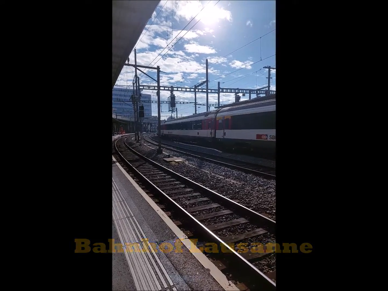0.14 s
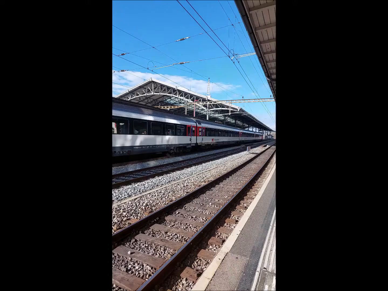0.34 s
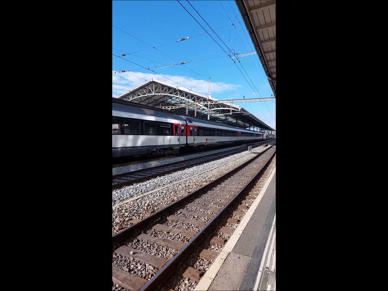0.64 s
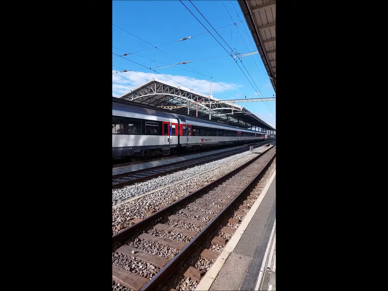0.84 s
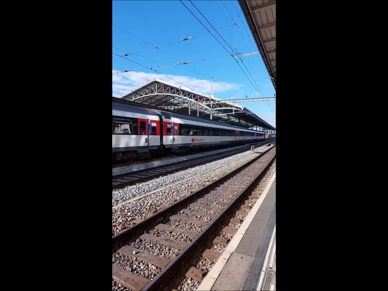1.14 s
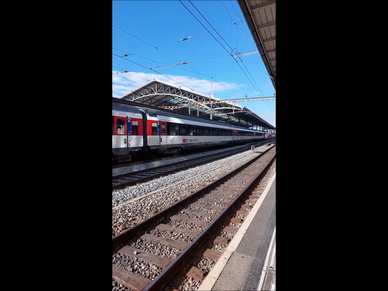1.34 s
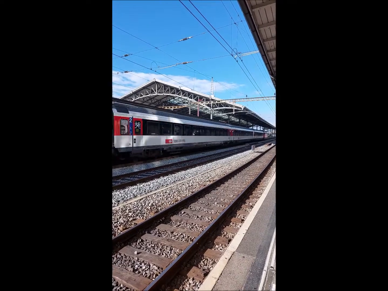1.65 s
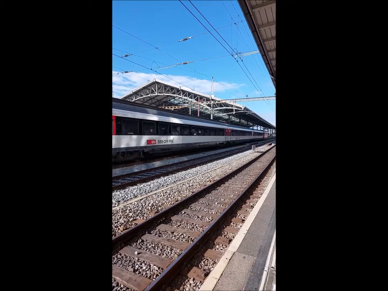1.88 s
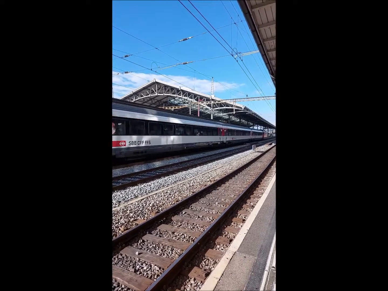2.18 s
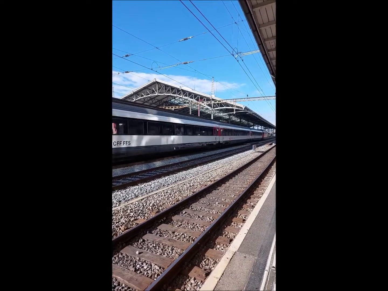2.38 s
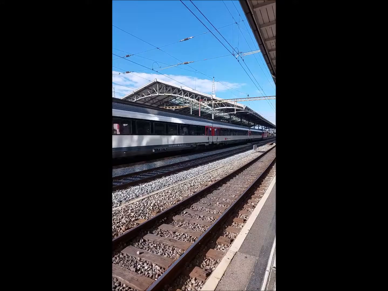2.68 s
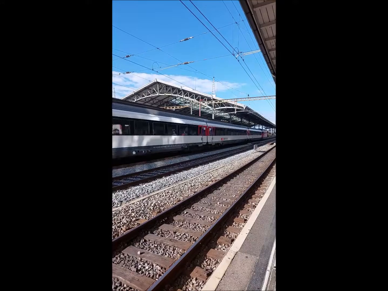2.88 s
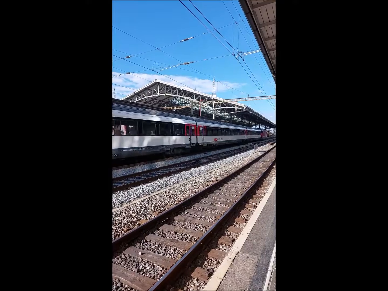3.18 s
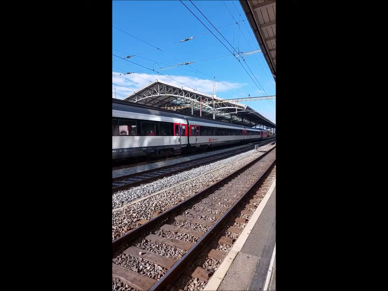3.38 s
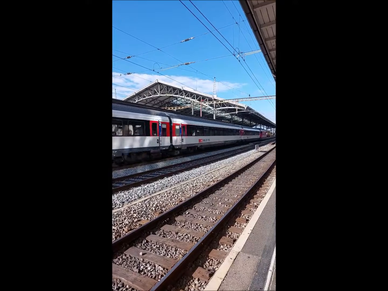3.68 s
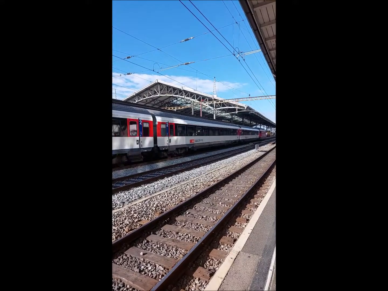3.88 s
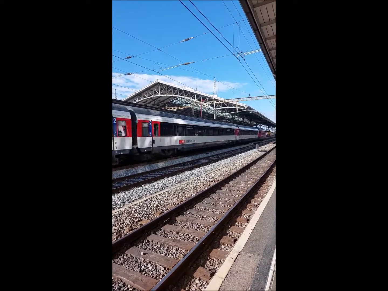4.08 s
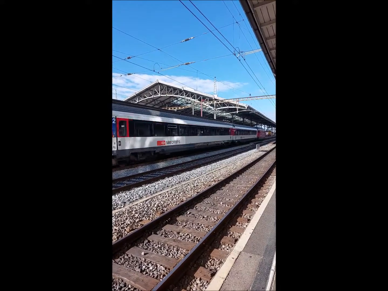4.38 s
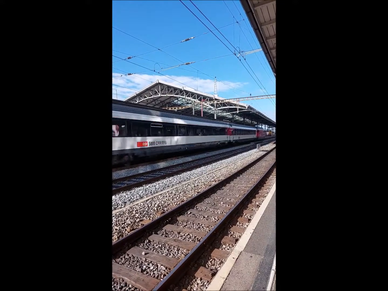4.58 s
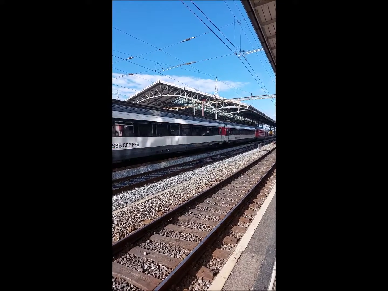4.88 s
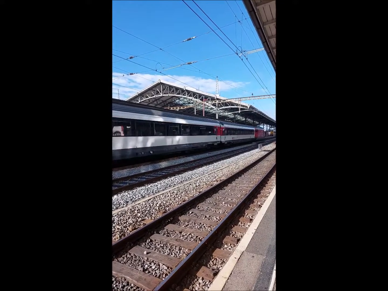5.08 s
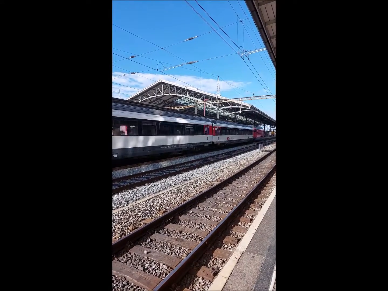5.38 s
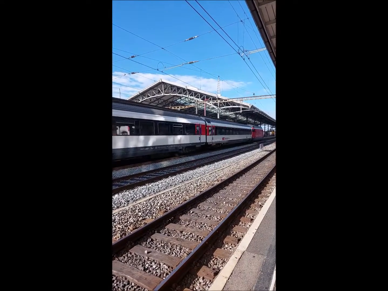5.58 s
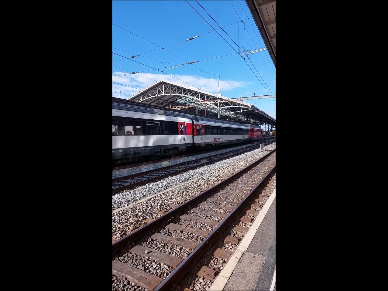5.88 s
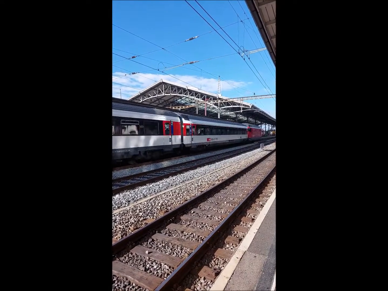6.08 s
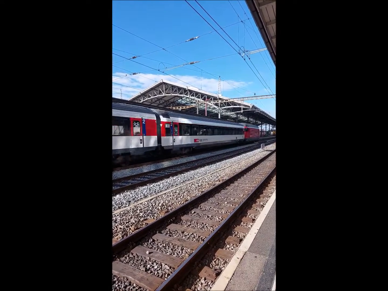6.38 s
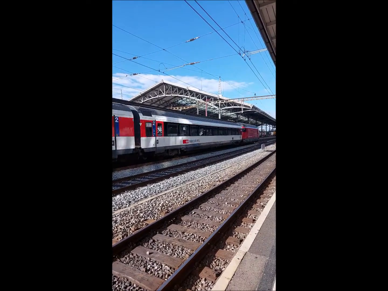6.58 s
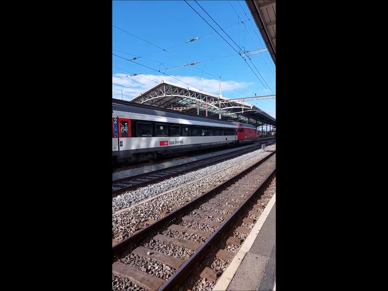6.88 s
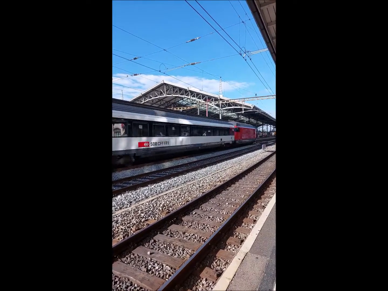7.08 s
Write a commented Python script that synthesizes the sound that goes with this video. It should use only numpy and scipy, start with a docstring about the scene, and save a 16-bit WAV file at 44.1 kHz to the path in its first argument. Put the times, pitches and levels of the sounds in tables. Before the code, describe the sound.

A passenger train rolls past a station platform, its wheels giving several high, sustained squeals over a low rumble.

```python
"""Steel wheels squeal as passenger coaches roll past a station platform on curved track. Stick-slip friction
sustains their high modes, and the Doppler effect lowers most notes a little. Flanges grind and hiss in sliding
contact with the rail; surface roughness and rail joints force the bogies and the ground into rumbling
vibration. A first scene, the faint rumble of another train, fades out; the scene changes, and after a short
silence this train fades in."""
import sys
import numpy as np
from scipy import signal
from scipy.fft import rfft, irfft, next_fast_len
from scipy.io import wavfile
from scipy.ndimage import uniform_filter1d, map_coordinates

SR = 44100
rng = np.random.default_rng(int(sys.argv[2]) if len(sys.argv) > 2 else 0)


def inscribe(sig):
    """Save sig as 16-bit PCM at rate SR to the path in sys.argv[1].

    A 1-D sig is mono; a 2-D sig holds one channel per row.
    Samples are clipped to [-1, 1] before scaling.
    """
    pcm = np.round(np.clip(np.atleast_2d(sig).T, -1, 1) * 32767)
    wavfile.write(sys.argv[1], SR, pcm.astype(np.int16))


N = 319725
TIME = np.arange(N) / SR

# Wheel modes that catch, sing and die away:
# onset t/s, rise/s, hold/s, decay/(dB/s), level/dB, initial f/Hz, limiting f/Hz, line width/Hz
SINGING_MODES = [ (0.459, .01, .18, 22, -46, 4850, 4720, 200), (1.05, .2, .03, 38, -51, 4800, 4745, 200),
                 (1.6, .5, .7, 36, -47.5, 4760, 4760, 200), (2.803, 0.088, .03, 70, -37, 4780, 4745, 200),
                 (2.82, 0.037, 0.034, 80, -36, 2368, 2340, 60),
                 (2.841, 0.51, 0.18, 10.5, -30.5, 12130, 12050, 120),
                 (2.881, 0.31, .1, 55, -32, 3198, 3134, 60), (2.902, 0.12, 0.43, 24, -38.5, 4030, 3880, 75),
                 (3.167, 0.14, 0.11, 110, -35.5, 2350, 2330, 60),
                 (3.36, 0.13, 0.58, 38, -29.5, 3962, 3920, 74),
                 (4.15, 0.26, .07, 43, -31.5, 2370, 2345, 60),
                 (4.299, 0.062, .33, 80, -33.5, 12060, 12100, 120),
                 (4.481, .1, .03, 46, -33, 3240, 3140, 85), (4.78, 0.12, .45, 24, -35, 3220, 3137, 85),
                 (4.5, .1, .2, 20, -33.5, 4700, 4500, 75), (4.781, 0.17, .5, 11, -31, 12370, 12100, 114.8),
                 (4.821, 0.35, .55, 9.5, -29, 7755, 7470, 105),
                 (4.85, 0.31, .75, 17.5, -30.5, 4660, 4510, 70), (5.242, .08, .03, 90, -35, 3990, 3880, 65),
                 (5.75, .12, 1.3, 10, -39.5, 4560, 4495, 70)]


def long_squeals(glide_s=1.3, flare_db=1.33):
    """Self-excited oscillation: stick-slip sustains a wheel mode, whose Doppler shift changes in passing."""
    out = np.zeros((2, N))
    for start, rise_s, hold_s, fade_db_per_s, db, initial_hz, limit_hz, width_hz in SINGING_MODES:
        live = (TIME > start) & (TIME < start + 3)
        pitch_hz = limit_hz + (initial_hz - limit_hz) * np.exp((start - TIME[live]) / glide_s)
        gain = swell(start, rise_s, hold_s, fade_db_per_s) * amp(db + flare_db * wobble(9))
        out[:, live] += gain[live] * squeal(pitch_hz, width_hz, live)
    return out


def squeal(pitch_hz, width_hz, live, wander=0.00221, direct_share=.2):
    """Superposition: the direct, slightly wandering tone of a wheel mode adds to its scattered sound."""
    phase = 2 * np.pi * np.cumsum(pitch_hz * (1 + wander * wobble(18)[live])) / SR
    path_phase = 1.22 * np.array([wobble(5)[live], wobble(5)[live]])  # the path to each ear shifts
    direct = unit(np.sin(phase + path_phase))
    scattered = ringing(pitch_hz, width_hz, skirt=6.55)
    return np.sqrt(direct_share) * direct + np.sqrt(1 - direct_share) * scattered


# Weaker wheel modes, the widest mere bands of sizzle:
# onset t/s, end t/s, centre f/Hz, line width/Hz, relative level/dB
WEAK_MODES = [ (.4, .9, 9650, 300, -52), (.47, 1.6, 2330, 160, -55.5), (.55, 1.6, 3950, 90, -58.5),
              (1.5, 2.901, 14600, 2600, -53), (1.5, 2.6, 12900, 900, -59), (1.7, 2.85, 14560, 70, -57),
              (1.75, 2.85, 9520, 350, -56), (1.85, 2.8, 10930, 60, -62), (2.6, 2.802, 14510, 15, -46),
              (2.82, 3.1, 14920, 90, -41), (2.83, 3.5, 6590, 180, -40), (2.83, 3.55, 9800, 80, -44.5),
              (2.83, 3.152, 11450, 90, -40), (2.83, 3.25, 14090, 70, -43), (3.48, 4.15, 8120, 12, -41),
              (3.5, 4.301, 7850, 600, -41.5), (3.499, 4.201, 11980, 550, -36.5),
              (4.39, 4.65, 6722, 40, -37.5), (4.389, 4.65, 5805, 120, -40.5), (4.39, 4.7, 10460, 70, -38.5),
              (4.389, 5.25, 10970, 130, -39), (4.39, 4.68, 11575, 50, -38), (4.39, 4.72, 14270, 60, -38),
              (4.39, 4.68, 15080, 120, -40), (4.449, 5.6, 4000, 70, -40.5), (4.76, 5.2, 14143, 40, -36),
              (5.4, 5.95, 14940, 130, -42), (5.7, 7.4, 2300, 320, -43.5), (7.099, 7.35, 3640, 70, -43.5),
              (7.1, 7.3, 13570, 47, -43), (7.12, 7.35, 2695, 50, -36)]


def brief_squeals(sag_per_s=0.00393):
    """Frictional excitation: weaker modes swell and let go, sinking slowly by the Doppler effect."""
    out = np.zeros((2, N))
    for start, end, hz, width_hz, db in WEAK_MODES:
        live = (TIME > start) & (TIME < end)
        t = TIME[live]
        arch = np.abs(np.sin(np.pi * (t - start) / (end - start))) ** 0.33
        pitch_hz = hz * (1 - sag_per_s * (t - (start + end) / 2))
        out[:, live] += amp(db + 2.5) * arch * ringing(pitch_hz, width_hz, skirt=2.0)
    return out


# Balance of the squeals: f/Hz, right level over left/dB
SQUEAL_BALANCE = [(2300, 0), (3200, 0), (4000, 3), (7500, 3), (12000, 4)]


def wheel_squeals():
    """Interaural level difference: the higher squeals are heard to the right."""
    squeals = long_squeals() + brief_squeals()
    return filtered(squeals, lambda hz: amp(along(SQUEAL_BALANCE, hz) * np.array([[-.5], [.5]])))


# Spectra of flange friction: f/Hz, relative spectral level/dB
GRIND_SPECTRUM = [(900, -24), (1800, -2), (2450, 4), (3400, -0.5), (4700, 3), (5400, -1.5), (5850, 1.5),
                  (6200, -2), (7000, 3.5), (7800, 3), (8700, -2.5), (10500, -9.5), (13000, -29),
                  (16000, -38)]
HISS_SPECTRUM = [(2000, -25), (5000, -43), (6200, -19), (7200, -13), (8600, -10.5), (9600, 0), (10500, -2),
                 (11800, 3.5), (13000, 3), (14000, -1), (15200, -0.5), (16000, -4)]


def flanges():
    """Sliding friction: steel grinds, rings and hisses; grind and hiss flicker with the contact force."""
    grind_gain, hiss_gain = flange_gains()
    contact_db = 0.74 * wobble(25)
    grind = grind_gain * amp(5 + contact_db) * noise(GRIND_SPECTRUM, patchy_db=3.0)
    ring = grind_gain * amp(-4.5) * steel_ring(GRIND_SPECTRUM)
    hiss = hiss_gain * amp(6.0 + contact_db) * noise(HISS_SPECTRUM, patchy_db=2.5)
    return (grind + ring + hiss) * amp([[-.9], [.9]])


# Light, continuous flange contact: t/s, relative level/dB of grind and of hiss
FLANGE_BRUSHING = [(.47, -49, -49.5), (1.15, -53, -51), (1.33, -53, -48.5), (1.47, -55.5, -54),
                   (2, -63.5, -54.5), (2.35, -62, -58.5), (2.8, -59, -48.5)]
# Hard flange contact: onset t/s, rise/s, hold/s, decay/(dB/s), relative level/dB of grind and of hiss
FLANGE_BITES = [(2.82, 0.047, 0.41, 11, -37, -37.5), (4.037, 0.22, .05, 26, -38, -40),
                (4.38, 0.037, 0.093, 40, -34, -33.5), (4.4, .3, 0.29, 3, -35, -34),
                (5.75, 0.13, 0.7, 6, -42.5, -48), (7.1, .06, .2, 5, -36, -38)]


def flange_gains():
    """Incoherent addition: brushing and bites sum in power to give the gains of grind and hiss."""
    power = amp(curves(FLANGE_BRUSHING)) ** 2
    for start, rise_s, hold_s, fade_db_per_s, grind_db, hiss_db in FLANGE_BITES:
        power += (amp([[grind_db], [hiss_db]]) * swell(start, rise_s, hold_s, fade_db_per_s)) ** 2
    return np.sqrt(power)


def steel_ring(spectrum, life_s=.45, count=420):
    """Damped modal vibration: rubbing wakes many faint wheel and rail modes, each for a moment."""
    out = np.zeros((2, N + 2 * SR))
    t = np.arange(SR // 2) / SR
    envelope = (t / life_s) * np.exp(-6 * t / life_s) * (1 - t / t[-1])
    for when, height, strength, left, right in rng.random((count, 5)):
        hz = 2100 * 7 ** height
        phase = 2 * np.pi * (hz * t * (1 - 0.0023 * t) + np.array([[left], [right]]))
        gain = amp(along(spectrum, hz) + 7.8 * strength)
        onset = int(when * N)
        out[:, onset:onset + len(t)] += gain * envelope * np.sin(phase)
    return unit(out[:, :N])


# Spectra of ground shake, bogie rumble and rolling roar: f/Hz, relative spectral level/dB
SHAKE_SPECTRUM = [(12, -33), (25, -26), (45, -9.5), (70, -1.5), (105, -5), (170, -24), (400, -60)]
RUMBLE_SPECTRUM = [(60, -29), (120, -9.5), (160, -6), (205, -5), (268, -2), (310, -2), (385, -9), (465, -6),
                   (560, -15), (900, -24.5), (2500, -77)]
ROAR_SPECTRUM = [(250, -24), (560, -3.5), (800, -4), (1200, -2.5), (1700, -2.5), (2400, -5), (3300, -9),
                 (4500, -9.5), (6000, -65), (12000, -50)]


def running_gear():
    """Roughness excitation: wheels on rough rail shake the ground, rumble in the bogies and roar."""
    shake_gain, rumble_gain, roar_gain = rolling_gains()
    shake = shake_gain * amp(1.9 * wobble(16)) * noise(SHAKE_SPECTRUM, patchy_db=.5)
    rumble = rumble_gain * amp(-2.0 + 0.71 * wobble(14)) * noise(RUMBLE_SPECTRUM, patchy_db=1.9)
    roar = roar_gain * amp(2.0 + 0.91 * wobble(22)) * noise(ROAR_SPECTRUM, patchy_db=2.5)
    panned = shake * amp([[-1.5], [1.5]]) + rumble * amp([[-.6], [.6]]) + roar * amp([[-.3], [.3]])
    return panned + bogie_drones(rumble_gain)


# Rolling noise, swelling as each coach end passes: t/s, relative level/dB of shake, rumble and roar
ROLLING_LEVELS = [(.47, -62, -46.5, -52), (1.2, -58, -43.5, -54), (1.75, -57, -41, -54.5),
                  (2.05, -49.5, -38.5, -51.5), (2.72, -47, -33.5, -48.5), (2.95, -47, -35.5, -40),
                  (3.15, -48.5, -36.5, -41.5), (3.7, -50, -38.5, -48.5), (4.2, -50.5, -37, -43.5),
                  (4.6, -50, -35, -39), (5.15, -45.5, -36.5, -43.5), (5.7, -48, -35.5, -42),
                  (6.3, -48, -36.5, -42.5), (6.65, -46, -34.5, -43), (7.25, -46.5, -34, -39.5)]
# Thumps at rail joints: t/s, relative level/dB of shake, rumble and roar
RAIL_JOINTS = [(2.83, -46, -29, -37.5), (5.57, -52, -27, -43), (6.31, -52, -33.5, -43),
               (7.07, -40, -28.5, -37)]


def rolling_gains(rise_s=.018, decay_s=.06):
    """Impact excitation: each rail joint adds a surge of power to the shake, rumble and roar."""
    power = amp(curves(ROLLING_LEVELS)) ** 2
    for when, *levels_db in RAIL_JOINTS:
        surge = np.exp(-np.maximum((when - TIME) / rise_s, (TIME - when) / decay_s))
        power += (amp(levels_db)[:, None] * surge) ** 2
    return np.sqrt(power)


# Bogie frames booming on rough rail: t/s, half length/s, level/dB of the low and of the upper mode
FRAME_BOOMS = [(1.922, 0.059, -42.5, -45), (2.033, 0.065, -44, -35.5), (2.598, .06, -47, -41),
               (2.76, 0.065, -33.5, -36), (2.829, 0.037, -38, -26), (3.803, 0.14, -41.5, -55),
               (4.56, 0.073, -50, -37.5), (5.574, .05, -42, -35.5), (6.12, 0.13, -39, -55),
               (6.299, .06, -45, -38)]
# Pitch of the upper frame mode: t/s, f/Hz
UPPER_MODE_PITCH = [(1.8, 268.2), (2.3, 268), (2.8, 286.1), (3.05, 272), (4.55, 277), (5.6, 258.9),
                    (7.25, 250.2)]


def bogie_drones(rumble_gain, low_db=-9.5, upper_db=-10):
    """Resonance: two modes of the bogie frames drone with the rumble and boom now and then."""
    power = (amp([[low_db], [upper_db]]) * rumble_gain) ** 2
    for when, half_s, *levels_db in FRAME_BOOMS:
        power += amp(levels_db)[:, None] ** 2 * np.exp(-((TIME - when) / half_s) ** 2)
    low_gain, upper_gain = np.sqrt(power)
    low_hz = 144.8 + 2.5 * TIME  # climbs as the train gathers speed
    low = low_gain * drone(low_hz, width_hz=11.7, wander_hz=2.504)
    upper = upper_gain * drone(curves(UPPER_MODE_PITCH)[0], width_hz=21, wander_hz=5.995)
    return low * amp([[-1.8], [1.8]]) + upper


def drone(pitch_hz, width_hz, wander_hz, tone_db=-0.5):
    """Narrow-band response: a bogie mode sounds as a wandering tone within its own flutter."""
    tone = np.sin(2 * np.pi * np.cumsum(pitch_hz + wander_hz * wobble(8)) / SR)
    return unit(amp(tone_db) * unit(tone) + ringing(pitch_hz, width_hz)[0])


# Spectrum of the first scene, the faint rumble of another train: f/Hz, relative spectral level/dB
FIRST_SCENE_SPECTRUM = [(15, -58), (25, -28), (45, -25), (73, -7.5), (125, -18), (181, -24), (237, -11), (344, -24),
                        (415, -22), (729, -31.5), (15000, -55)]


def first_scene_rumble(initial_db=-47.5, fade_db_per_s=36, end_s=.27):
    """Exponential decay: the faint rumble of another train, noise with low spectral peaks, fades, then closes
    on a short ramp."""
    closing = np.clip((end_s - TIME) / 0.024, 0, 1)
    return amp(initial_db - fade_db_per_s * TIME) * noise(FIRST_SCENE_SPECTRUM, patchy_db=2) * closing


# Likeness of the noise at the two ears: f/Hz, correlation coefficient
EAR_CORRELATION = [(30, 0.72), (120, 0.79), (280, 0.71), (600, 0.61), (1200, 0.25), (3000, 0.09),
                   (12000, 0.072)]


def noise(spectrum, patchy_db):
    """Interaural coherence: noise of rms 1 with random patches of gain, wide in treble, narrow in bass."""
    def mid_side_response(hz):
        angle = np.arccos(np.clip(along(EAR_CORRELATION, hz), -1, 1)) / 2
        return amp(along(spectrum, hz)) * [np.cos(angle), np.sin(angle)]

    white = signal.stft(rng.standard_normal((2, N)), nperseg=1024)[2]
    patches = uniform_filter1d(rng.standard_normal(white.shape[1:]), size=4, axis=0)  # over frequency
    patches = uniform_filter1d(patches, size=14, axis=1)  # over time
    pair = signal.istft(white * amp(patchy_db * unit(patches)), nperseg=1024)[1][:, :N]
    mid, side = filtered(pair, mid_side_response)
    return unit(np.array([mid + side, mid - side]))


def ringing(pitch_hz, width_hz, skirt=6):
    """Multipath interference: a mode flutters in amplitude and phase, differently at each ear."""
    count = len(pitch_hz)
    size = next_fast_len(count + 4096)
    detune = 2 * np.fft.fftfreq(size, 1 / SR) / width_hz
    drive = rng.standard_normal((2, size)) + 1j * rng.standard_normal((2, size))
    flutter = np.fft.ifft(drive / (1 + 1j * detune) / (1 + 1j * detune / skirt))[:, :count]
    carrier = np.exp(2j * np.pi * np.cumsum(pitch_hz) / SR)
    return unit(np.real(flutter * carrier))


def swell(start, rise_s, hold_s, fade_db_per_s):
    """Growth and decay: a friction sound builds as a power of time, holds, then dies exponentially."""
    t = TIME - start
    return np.clip(t / rise_s, 0, 1) ** 0.6 * amp(-fade_db_per_s * np.maximum(t - rise_s - hold_s, 0))


def wobble(rate):
    """Random modulation: a spline through `rate` random knots a second."""
    coarse = TIME[::32]
    knots = rng.standard_normal(int(N * rate / SR) + 4)
    return np.interp(TIME, coarse, map_coordinates(knots, [coarse * rate]))


def filtered(x, response):
    """Linear filtering: the spectrum of x times a frequency response."""
    size = next_fast_len(N + 8192)
    return irfft(rfft(x, size) * response(np.fft.rfftfreq(size, 1 / SR)), size)[..., :N]


def along(points, hz):
    """Interpolation of (f/Hz, value) points on a logarithmic frequency axis."""
    point_hz, values = np.transpose(points)
    return np.interp(np.log(hz + 1), np.log(point_hz + 1), values)


def curves(rows):
    """Linear interpolation, to every sample, of each column after t/s."""
    times, *columns = np.transpose(rows)
    return [np.interp(TIME, times, column) for column in columns]


def amp(db):
    """Amplitude ratio of a level in decibels."""
    return 10 ** (np.asarray(db) / 20)


def unit(x):
    """Normalisation to rms 1."""
    return x / np.sqrt(np.mean(x ** 2) + 1e-20)


def scene(train_start_s=.467):
    """Superposition: a first scene, then after a silence all the sources of this train, fading in together."""
    first_scene = first_scene_rumble()
    train = wheel_squeals() + running_gear() + flanges()
    fade_in = np.minimum(0.064 + (TIME - train_start_s) / 0.83, 1) * (TIME > train_start_s)
    return train * fade_in + first_scene


def record(dry, cutoff_hz=15900):
    """Band limiting: a steep low-pass filter removes the highest treble."""
    return filtered(dry, lambda hz: 1 / (1 + np.exp(np.clip((hz - cutoff_hz) / 25, -50, 50))))


dry = scene()
out = record(dry)
inscribe(out)
```